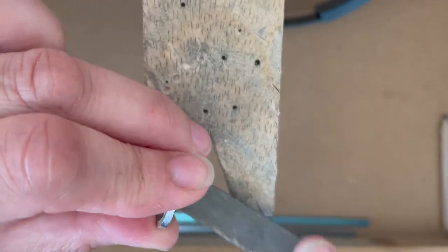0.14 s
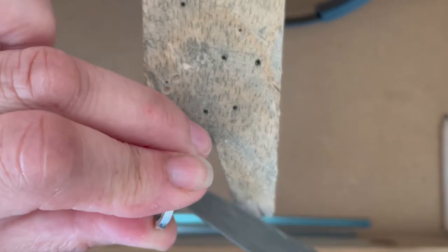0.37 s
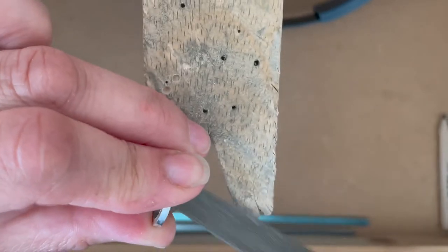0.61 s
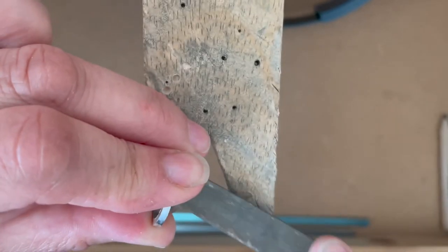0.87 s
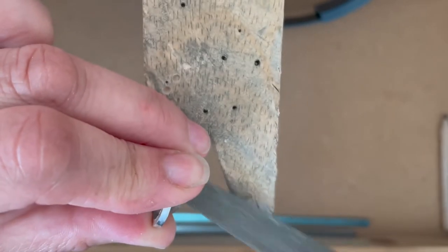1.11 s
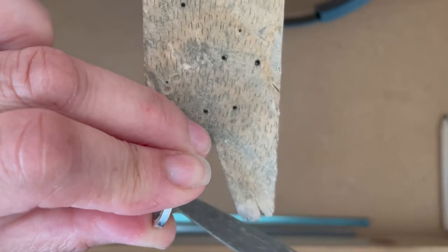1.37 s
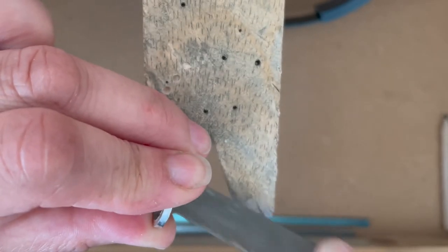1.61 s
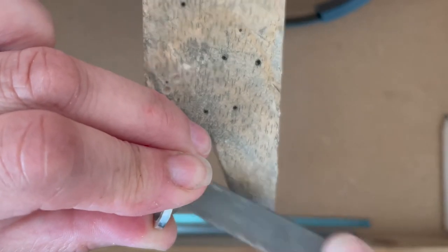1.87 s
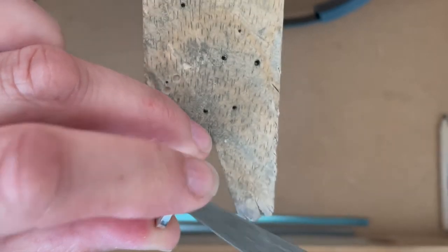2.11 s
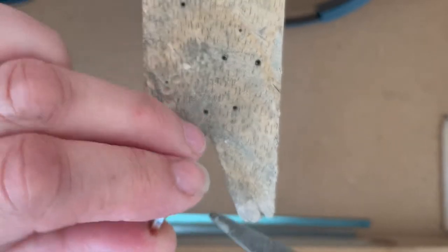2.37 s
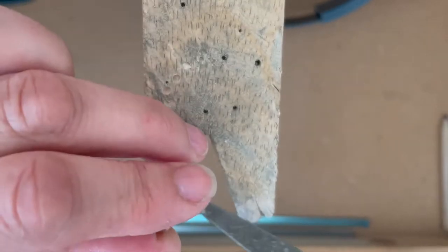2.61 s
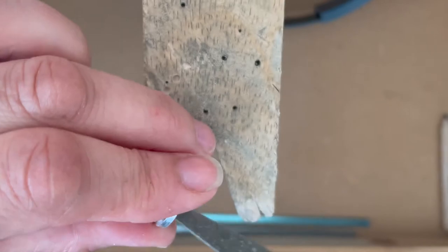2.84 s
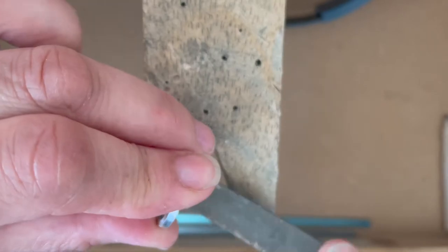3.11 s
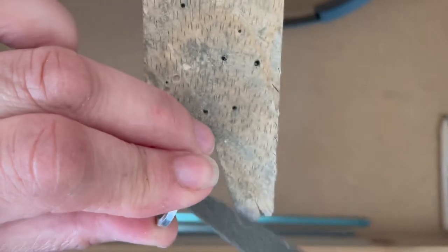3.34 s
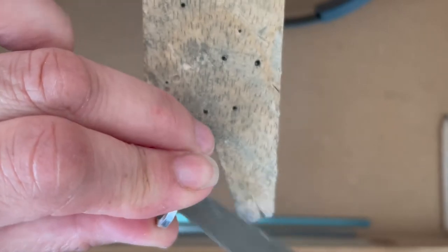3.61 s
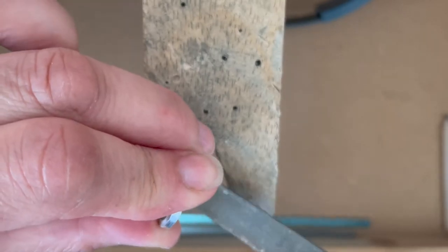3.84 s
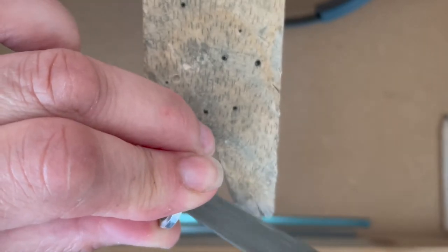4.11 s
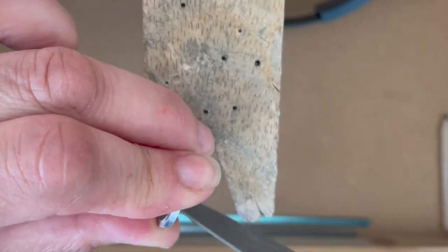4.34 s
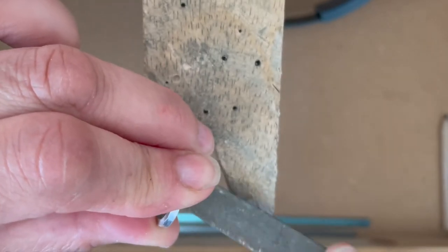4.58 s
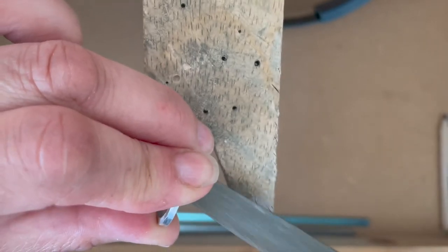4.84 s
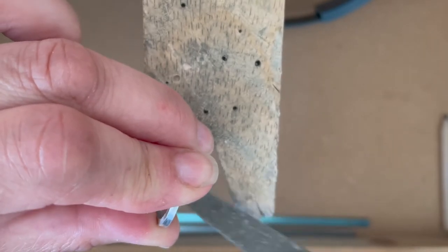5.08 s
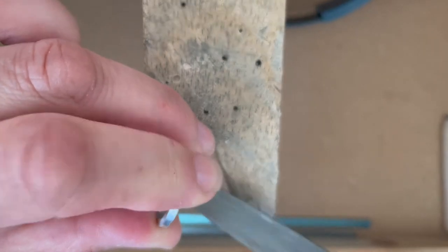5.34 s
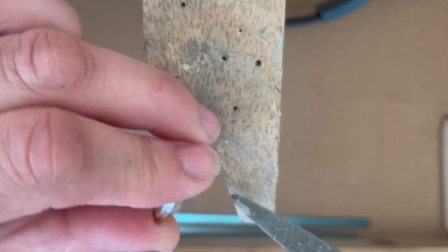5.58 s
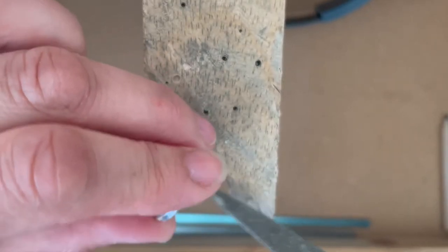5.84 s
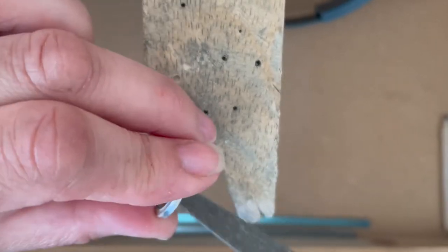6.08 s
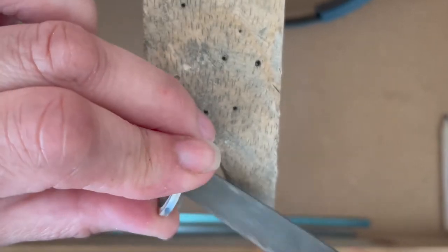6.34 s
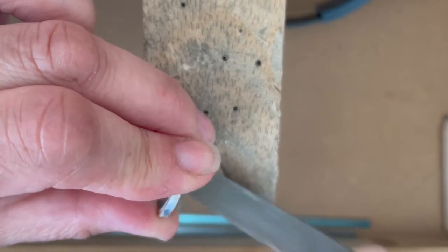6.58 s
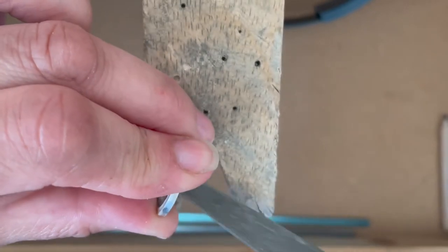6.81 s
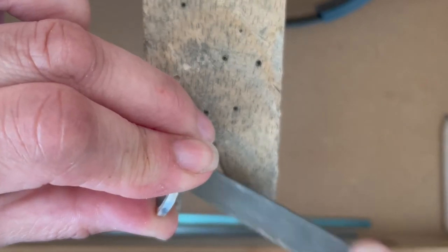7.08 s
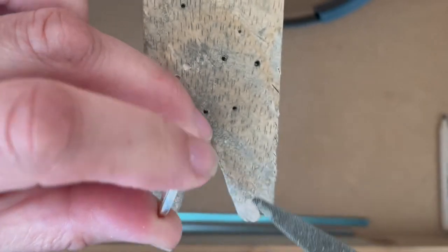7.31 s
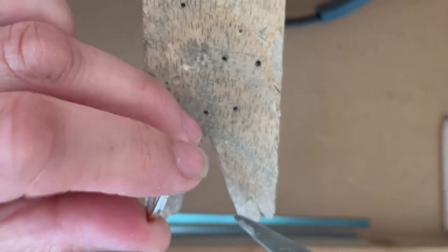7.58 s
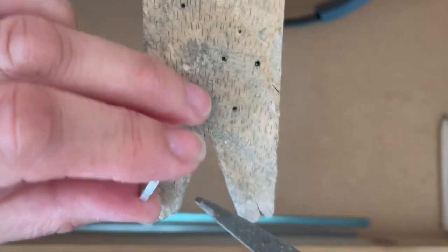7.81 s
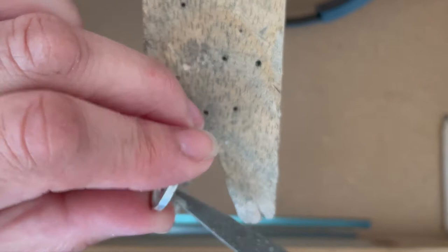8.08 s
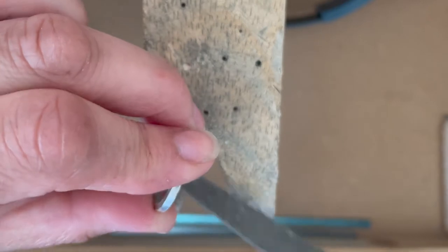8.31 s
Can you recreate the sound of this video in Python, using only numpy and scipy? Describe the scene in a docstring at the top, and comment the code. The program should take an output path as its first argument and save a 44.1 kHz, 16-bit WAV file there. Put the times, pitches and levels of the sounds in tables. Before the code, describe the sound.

Close stereo pickup in a quiet indoor room. A steel file scrapes to and fro over a small metal piece held on a wooden peg, about six strokes a second, dry and gritty with a woody body. Three bursts each end in a brief skid; light taps and faint finger rubs fill the pauses, and one last short stroke closes it.

```python
"""A hand file rasps to and fro over a small metal piece on a wooden bench peg: three bursts, then a brief last one.
Dense random tooth clicks, swelling with each stroke, ring modes of the bench, the peg and the file.
Skids close the bursts; light taps (clicks into soft resonances) and finger rubs (gentle strokes) lie around them.
A quiet room hums below, of shaped noise and wavering tones, with faint regular ticking.
Two close microphone ports hear it all with a phase difference that turns with frequency."""
import sys
import numpy as np
from scipy import signal
from scipy.fft import rfft, irfft, next_fast_len
from scipy.io import wavfile
from scipy.ndimage import map_coordinates

SR = 44100
rng = np.random.default_rng(int(sys.argv[2]) if len(sys.argv) > 2 else 0)


def put_to_file(sound):
    """Save the sound as 16-bit audio at rate SR, in the file named by the first command-line argument."""
    columns = np.atleast_2d(sound).T  # one column per channel
    safe = np.clip(columns, -1, 1)
    whole_steps = np.round(safe * 32767)
    wavfile.write(sys.argv[1], SR, whole_steps.astype(np.int16))


def convert_level_to_amplitude(level_db):
    """Map a level in decibels to its linear amplitude factor."""
    exponent = np.asarray(level_db, float) / 20
    return 10 ** exponent


N = 372204

# upper modes of the wooden peg: (frequency [Hz], width [Hz], relative level [dB])
PEG_UPPER_MODES = [(2021, 98, -4.5), (2291, 96, -4.5), (2653, 286, 1.5), (2952, 298, -2.5), (3173, 91, -3),
                   (3622, 132, -7), (3766, 300, -15.5)]
# ringing modes of the steel file: (frequency [Hz], width [Hz], relative level [dB])
FILE_MODES = [(4500, 900, -8), (5000, 240, -10), (5210, 35, 0), (5413, 300, 3), (5940, 300, -11.5),
              (6610, 270, -4.5), (6950, 56, -2), (7470, 1100, -0.5), (8900, 130, -8.5)]
# sizzling top modes of the file: (frequency [Hz], width [Hz], relative level [dB])
FILE_TOP_MODES = [(9100, 500, 2), (9900, 500, 3), (10700, 600, 2), (11600, 400, -2), (12400, 900, -3),
                  (13400, 500, -8), (15200, 700, -19)]


def rms_one(x):
    """Scale to rms 1."""
    return x / np.sqrt(np.mean(x ** 2) + 1e-20)


def in_time(rows):
    """Breakpoints (time [s], value) drawn out to a curve over all samples."""
    s, value = np.transpose(rows)
    return np.interp(np.arange(N) / SR, s, value)


def drift(rate_hz):
    """Slow random curve of rms 1: noise through a double pole, made at every 40th sample."""
    hop = 40
    r = np.exp(-2 * np.pi * rate_hz * hop / SR)
    noise = rng.standard_normal(N // hop + 2002)
    slow = rms_one(signal.lfilter([1], [1, -2 * r, r * r], noise)[2000:])  # drop the run-in
    return np.interp(np.arange(N) / hop, np.arange(len(slow)), slow)


def resonance(x, hz, width_hz):
    """Two-pole resonance with gain 1 at its peak."""
    r = np.exp(-np.pi * width_hz / SR)
    zeros = (1 - r * r) / 2 * np.array([1, 0, -1])
    poles = [1, -2 * r * np.cos(2 * np.pi * hz / SR), r * r]
    return signal.lfilter(zeros, poles, x + 1e-18)


def body(force, modes, shifting_db):
    """Parallel modes, each drifting in level as a wandering contact would; white force of rms 1 gives about rms 1."""
    power = sum(convert_level_to_amplitude(2 * db) * np.pi * width / SR for _, width, db in modes)
    out = np.zeros(N)
    for k, (hz, width, db) in enumerate(modes):
        drive = force * convert_level_to_amplitude(shifting_db * drift(9.4))
        out += (-1) ** k * convert_level_to_amplitude(db) * resonance(drive, hz, width)
    return out / np.sqrt(power)


def teeth(per_s, spread_db, chatter_db):
    """Teeth catch at random with chattering strength, a few far harder than the rest; rms 1."""
    sizes = convert_level_to_amplitude(spread_db * np.minimum(rng.exponential(1, N), 5)) * rng.choice([-1, 1], N)
    caught = rng.random(N) < per_s / SR
    return rms_one(sizes * caught * convert_level_to_amplitude(chatter_db * drift(120)))


def blows(rows, db, delay_s):
    """One click per row, at the time in its first column."""
    clicks = np.zeros(N)
    clicks[((np.array(rows)[:, 0] + delay_s) * SR).astype(int)] = convert_level_to_amplitude(db)
    return clicks


def swell(start, fastest, end):
    """Samples of one movement, how far along it is (0-1, fastest at .5) and its speed (0-1)."""
    at = np.arange(max(int(start * SR), 0), min(int(end * SR), N))
    along = np.interp(at / SR, [start, fastest, end], [0, .5, 1])
    return at, along, np.sin(np.pi * along)


def tail(t60_s):
    """Reverberant tail: exponentially dying noise of energy 1."""
    t = np.arange(SR) / SR
    h = rng.standard_normal(len(t)) * convert_level_to_amplitude(-60 * t / t60_s)
    return h / np.sqrt(np.sum(h ** 2))


def rumble():
    """Dull room noise: white noise coloured in the spectrum."""
    # room noise spectrum: (frequency [Hz], relative level per Hz [dB])
    colour_points = [(59, -44), (100, 6.5), (177, -6.5), (393, -10), (665, -22.5), (1550, -32.5),
                     (1790, -27), (2790, -37.5), (3380, -50), (4500, -36.5), (5850, -63), (9900, -120)]
    hz = np.fft.rfftfreq(N, 1 / SR) + 1
    point_hz, point_db = np.transpose(colour_points)
    colour = convert_level_to_amplitude(np.interp(np.log(hz), np.log(point_hz), point_db))
    return convert_level_to_amplitude(-75) * rms_one(irfft(rfft(rng.standard_normal(N)) * colour, N))


def wavering_hum():
    """Low sines that wander in pitch and level under a common level curve."""
    # wavering tones: (mean frequency [Hz], relative level [dB])
    hum_tones = [(61.5, 0), (82.5, -4)]
    # rms level of the whole hum: (time [s], level [dB])
    hum_curve = [(0.0, -57), (0.61, -70), (0.65, -71), (0.84, -60), (0.96, -62), (2.44, -63), (2.54, -70),
                 (3.74, -59.5), (4.7, -64), (4.89, -59.5), (5.08, -66), (6.23, -63.5), (6.37, -71),
                 (6.89, -60), (7.69, -74), (8.44, -74)]
    hum = np.zeros(N)
    for tone_hz, db in hum_tones:
        phase = 2 * np.pi * np.cumsum(tone_hz + 4 * drift(6)) / SR
        hum += convert_level_to_amplitude(db + 2.5 * drift(4)) * np.sin(phase)
    return convert_level_to_amplitude(in_time(hum_curve)) * rms_one(hum)


def hiss():
    """Faint treble noise: a broad noise band feeds parallel resonances that drift in level."""
    # bands of the hiss: (frequency [Hz], width [Hz], relative level [dB])
    hiss_bands = [(5100, 300, -3), (6800, 1500, -4), (8000, 1200, -4), (10000, 1200, -3), (11400, 500, 2),
                  (12500, 1000, -4), (13400, 150, 3)]
    steep = resonance(rng.standard_normal(N), 11000, 9000)
    return convert_level_to_amplitude(-87) * rms_one(body(steep, hiss_bands, shifting_db=3.2))


def ticking():
    """Two faint regular tickings: each click, slightly uneven in level, rings a resonance twice over."""
    # tickings: (first tick [s], period [s], frequency [Hz], width [Hz], mean click level before ringing [dB])
    tick_rows = [(.0318, .06665, 6500, 2500, -56), (.135, .1666, 7600, 1500, -53)]
    out = np.zeros(N)
    for first, period, tick_hz, width, db in tick_rows:
        clicks = np.zeros(N)
        at = (np.arange(first, N / SR, period) * SR).astype(int)
        clicks[at] = convert_level_to_amplitude(db + rng.normal(0, 2.5, len(at)))
        out += resonance(resonance(clicks, tick_hz, width), tick_hz, width)
    return out


def room_tone():
    """The quiet room: rumble, wavering hum, hiss, a thin tone of very narrow noise, and ticking."""
    thin_tone = convert_level_to_amplitude(-82) * rms_one(resonance(rng.standard_normal(N), 325, 7.3))
    return rumble() + wavering_hum() + hiss() + thin_tone + ticking()


def taps():
    """A short crack from peg and file, the heavy bench late; soft contact keeps treble out of the low modes."""
    # taps of file and piece:
    # (time [s], peg level [dB], then levels re peg of bench [dB], upper peg [dB], file [dB])
    tap_rows = [(2.24, -31, -13, -6, -25.5), (2.545, -70.5, 0, -15, -16), (2.57, -69, -6, -11, -20),
                (2.862, -43, -13.5, -0.5, -13.5), (5.529, -30, -14.5, -5.5, -25),
                (5.575, -55, -3, -16, -19), (5.709, -63, 1.5, -27, -18), (6.042, -40, -13.5, -4, -14),
                (7.438, -56, 0.5, -28, -27), (7.723, -50.5, -3.5, -37, -42), (7.881, -70.5, 1.5, -15, -17),
                (8.232, -57.5, -11, -6, -21)]
    # what a tap rings, part by part: (frequency [Hz], width [Hz], relative peak level [dB])
    bench_rings = [(124, 28, 4), (235, 60, -4), (400, 45, -7), (565, 28, -3), (764, 30, -6)]
    peg_rings = [(1400, 230, 1), (1100, 160, -11)]
    upper_rings = [(2137, 50, -11), (2650, 330, 4), (3550, 300, -2)]
    file_rings = [(4300, 300, 3), (5300, 200, 6), (6600, 250, 0), (7250, 300, 3), (9800, 1200, 1)]
    top_rings = [(12200, 1500, 14), (14600, 1500, -17)]  # only hard steel contact reaches these
    _, peg_db, bench_re, upper_re, file_re = np.transpose(tap_rows)
    parts = [(bench_rings, peg_db + bench_re, .005, 1000),  # modes, level [dB], delay [s], softness cutoff [Hz]
             (peg_rings, peg_db, .0005, 2200),
             (upper_rings, peg_db + upper_re, .0002, 4200),
             (file_rings, peg_db + file_re, .0002, 15000),
             (top_rings, peg_db + 2 * file_re + 18, .0002, 17000)]
    out = np.zeros(N)
    for modes, db, delay_s, soft_hz in parts:
        softness = signal.butter(4, soft_hz, fs=SR, output="sos")
        push = signal.sosfilt(softness, blows(tap_rows, db, delay_s) + 1e-18)
        for k, (hz, width, gain_db) in enumerate(modes):
            unit_peak = SR / (2 * np.pi * width)  # a bare click would ring with peak 1
            out += (-1) ** k * convert_level_to_amplitude(gain_db) * unit_peak * resonance(push, hz, width)
    return out


def skids():
    """With little contact left the file tip rings more freely; the pitch of tip and peg sags as it slides off."""
    # the tip skids off the piece: (start [s], length [s], force level at the fastest point [dB])
    skid_rows = [(2.069, 0.04, -51.5), (5.363, 0.076, -49), (7.149, 0.033, -52.5)]
    # modes of the freed tip: (frequency [Hz], width [Hz], relative level [dB])
    tip_modes = [(1650, 120, -8), (3250, 90, 0), (3650, 90, 2), (4300, 250, -10), (5050, 120, -1),
                 (5350, 120, -5)]
    sag = 0.17  # fall in playing speed over a skid, as a share
    level, at_s = np.zeros(N), np.arange(N) / SR
    for start, length, db in skid_rows:
        at, along, speed = swell(start, start + length / 2, start + length)
        level[at] = convert_level_to_amplitude(db) * speed ** 1.36
        at_s[at] += sag * length * along * (1 - along) / 2  # read fast at first, slowly at last
    force = level * teeth(per_s=3000, spread_db=2.5, chatter_db=1.5)
    tip = body(force, tip_modes, shifting_db=1.5)
    peg = convert_level_to_amplitude(-3.5) * body(force, PEG_UPPER_MODES, shifting_db=1.5)
    ring = convert_level_to_amplitude(-7.5) * body(force, FILE_MODES, shifting_db=1.5)
    sizzle = convert_level_to_amplitude(2) * body(force, FILE_TOP_MODES, shifting_db=1.5)
    return map_coordinates(tip + peg, [at_s * SR], order=3) + ring + sizzle


def movements():
    """Force on each part over all strokes and rubs; strokes keep contact at reversals, rubs start and end at rest."""
    # strokes, each running until the next stroke or lift:
    # (start [s], fastest [s], bite [dB], brightness [dB], bench re bite [dB])
    stroke_rows = [(-0.06, 0.03, -44.5, -2, 1.5), (0.131, 0.25, -42, 2.5, -3), (0.317, 0.403, -45.5, -1, 1),
                   (0.512, 0.636, -47, 4.5, 1.5), (0.675, 0.786, -48.5, -1, 5), (0.855, 0.99, -48, 2, -2),
                   (1.027, 1.131, -51, 0.5, 4.5), (1.207, 1.349, -48, 0.5, 0), (1.399, 1.5, -48, 0, 1.0),
                   (1.564, 1.687, -45.5, 1, -2.5), (1.728, 1.819, -49.5, -1.5, 0.5),
                   (1.908, 2.049, -50, 0, 1.5), (2.857, 2.905, -56.5, 3, -12),
                   (2.89, 3.003, -49.5, -1.5, 4), (3.116, 3.253, -44, 1.5, -2.5), (3.29, 3.403, -52, 1, 5),
                   (3.5, 3.609, -49, 1.5, -1.5), (3.672, 3.766, -44, 0, 0.5),
                   (3.844, 3.923, -47.0, -0.5, 1), (4.035, 4.139, -46.5, -0.5, -3),
                   (4.205, 4.304, -43.5, 1, -3.5), (4.373, 4.484, -52.0, 1, 3.5),
                   (4.574, 4.699, -47, 0, -5.5), (4.74, 4.844, -54.5, 2.5, 9),
                   (4.919, 5.026, -52, 0.5, -0.5), (5.095, 5.193, -49, 1, 3), (5.242, 5.372, -54, -1, 3),
                   (6.033, 6.118, -61, 2, 8), (6.115, 6.202, -43, 0.5, -2), (6.278, 6.414, -54, 3, 4),
                   (6.481, 6.592, -44.5, -1, 0.5), (6.659, 6.764, -49, 2, 2.5), (6.86, 6.949, -44, 1, 1),
                   (7.014, 7.159, -49.5, 2, -1.5), (8.215, 8.271, -59, 1, -5.5),
                   (8.292, 8.393, -41.5, 2, -3.5)]
    # the file leaves the piece: (time [s])
    lift_times = [2.092, 5.383, 7.187, 8.48]
    # fingers shift the piece on the peg:
    # (start [s], length [s], bite [dB], brightness [dB], bench re bite [dB])
    rub_rows = [(2.463, 0.042, -84.5, -14, 6), (2.54, 0.064, -85, -8.5, -7), (2.649, 0.0765, -80, 2.5, 3),
                (2.707, 0.052, -97, -7, 17.5), (5.4, 0.15, -71.5, 3, 3), (5.56, 0.095, -69.5, 1.5, 2.5),
                (5.675, 0.041, -74, -14, 12.5), (5.79, 0.071, -81.5, 4.5, 11.5),
                (7.462, 0.067, -80, -16.5, 10.5), (7.711, 0.13, -78.5, 1, 10), (7.921, 0.074, -84, 4, 5.5)]
    # how lower peg, upper peg, file ring, file sizzle and bench thrum answer a stroke: (level re bite [dB],
    # share of brightness [dB/dB], power of speed, speed added by held contact, gain by mid-stroke [dB])
    part_answers = [(0.5, 0, 1.85, 0.071, -1.5), (-0.34, 1.9, 3.7, 0.17, -4), (-15.5, 2.7, 2.6, 0.2, 3.5),
                    (-15, .9, 1.5, 0.41, 0), (-0.5, 0.26, 0.66, 0.1, 0.5)]
    stops = np.sort([row[0] for row in stroke_rows] + lift_times)
    strokes = [(s, fastest, stops[stops > s][0], *db, 1) for s, fastest, *db in stroke_rows]
    rubs = [(s, s + length / 2, s + length, *db, 0) for s, length, *db in rub_rows]
    out = np.zeros((len(part_answers), N))
    for start, fastest, end, bite_db, bright_db, bench_db, held in strokes + rubs:
        at, along, speed = swell(start, fastest, end)
        for part, (db, share, power, rest, gain_db) in enumerate(part_answers):
            level_db = bite_db + db + share * bright_db + gain_db * 2 * along
            out[part, at] += convert_level_to_amplitude(level_db) * (speed + held * rest) ** power
        out[-1, at] *= convert_level_to_amplitude(bench_db)
    return out


def table_top(thrum):
    """Deep table-top mode shaken by noise whose level follows most of the bench thrum."""
    hz = 128
    shake = convert_level_to_amplitude(-13) * thrum ** 0.92 * rng.standard_normal(N)
    return body(resonance(shake, hz, 45), [(hz, 24, 0)], shifting_db=.4)


def filing():
    """The same teeth drive bench, peg and file; finer teeth join in on the steel."""
    # sudden hard bites inside a stroke: (time [s], strength before each part's gain [dB])
    catch_rows = [(0.159, -50), (0.555, -33), (0.6, -28.5), (0.648, -34.5), (0.892, -47), (1.443, -44.5),
                  (1.614, -46), (1.829, -37), (3.715, -56), (3.89, -32), (4.101, -29), (5.288, -41),
                  (6.17, -36), (6.323, -45), (6.342, -37.5), (6.396, -35.5), (6.909, -34), (7.062, -48),
                  (8.28, -40.5)]
    # how brightly the part of the file in use cuts: (time [s], gain on the steel's force [dB])
    keenness = [(0, -1.5), (1.2, 1.5), (2.1, -2), (2.9, -0.5), (3.9, -6.5), (4.4, -3.5), (5.0, -3),
                (5.4, 0.5), (6.1, -4), (6.6, -3), (7.2, -2), (8.44, -2.5)]
    # bench modes: (frequency [Hz], width [Hz], relative level [dB])
    bench_modes = [(194.5, 110, -17.5), (282.7, 68.7, -1), (329.2, 19.2, 2.5), (395, 20, -5.5),
                   (511.6, 45, -16.5), (545.6, 23, -10), (668, 59, -18.5)]
    # lower modes of the wooden peg: (frequency [Hz], width [Hz], relative level [dB])
    peg_lower_modes = [(731.4, 40, -3.5), (898, 50, -5.5), (987.5, 26.3, 5.5), (1169, 65, 0),
                       (1254.5, 65, 4), (1396, 190, -5)]
    lower, upper, ring, sizzle, thrum = movements()

    # a catch loads the teeth at once and lets go gradually, 16 ms time constant
    catch_db = np.array(catch_rows)[:, 1]
    fading = np.exp(-1 / (0.016 * SR))
    caught = signal.lfilter([1], [1, -fading], blows(catch_rows, catch_db - 10.5, 0) + 1e-18)
    snap = convert_level_to_amplitude(4) * blows(catch_rows, catch_db, 0)  # the first tooth of a catch

    force = teeth(per_s=3300, spread_db=3, chatter_db=1.5)
    fine = 0.21 * force + 0.31 * teeth(per_s=5700, spread_db=3, chatter_db=1)
    fine = fine * convert_level_to_amplitude(in_time(keenness))

    bench = body(thrum * force, bench_modes, shifting_db=4)
    bench = signal.sosfilt(signal.butter(3, 200, "high", fs=SR, output="sos"), bench)
    peg_low = -body((lower + convert_level_to_amplitude(-2.5) * caught) * force + snap, peg_lower_modes, shifting_db=3.5)
    peg_high = body((upper + convert_level_to_amplitude(-4) * caught) * force + snap, PEG_UPPER_MODES, shifting_db=1.5)
    steel = -body((ring + convert_level_to_amplitude(-13) * caught) * fine + convert_level_to_amplitude(-15.5) * snap, FILE_MODES, shifting_db=4.5)
    top = body((sizzle + convert_level_to_amplitude(-20) * caught) * fine + convert_level_to_amplitude(-13) * snap, FILE_TOP_MODES, shifting_db=2)
    return table_top(thrum) + bench + peg_low + peg_high + steel + top


def scene():
    """Filing, skids and taps with the room's near and late reply, over the room tone."""
    work = filing() + skids() + taps()
    near = convert_level_to_amplitude(-12) * tail(0.17)
    late = convert_level_to_amplitude(-18.5) * signal.sosfilt(signal.butter(1, 11000, fs=SR, output="sos"), tail(0.48))
    heard = work + signal.fftconvolve(work, near + late)[:N] + room_tone()
    return np.array([heard, heard])


def band_limit(x):
    """A steep low-pass at the top of the band."""
    return signal.sosfilt(signal.butter(12, 15980, fs=SR, output="sos"), x)


def record(dry):
    """The deep bass is cut; each port gets its own phase and level, plus scattered sound of opposite sign."""
    # microphone ports: (frequency [Hz], phase lead of left [rad], left over right [dB],
    # scattered sound of opposite sign in the two ports [dB])
    port_rows = [(0, 0, 0, -34), (60, -.03, -.2, -31), (130, -.07, -.6, -25), (300, -.25, -.8, -18),
                 (600, -.4, 0, -6), (850, 0, 0, -1), (1150, 0, -1.5, -12), (1900, 0, 0, -24),
                 (2900, .7, -2.5, -14), (3650, .6, -5, -7), (4100, .1, -1, -8), (4800, .5, 0, -1),
                 (5500, .4, -2, -7), (6000, .1, 0, -13), (7500, 1.6, 0, -9), (8700, 2.6, 0, -9),
                 (9400, 3.05, 0, -18), (10500, 3.2, 0, -18), (11600, 3.8, 0, -9), (13300, 5.1, 0, -7),
                 (14100, 6.28, 0, -20)]
    dry = signal.sosfilt(signal.butter(3, 44, "high", fs=SR, output="sos"), dry)
    size = next_fast_len(N + SR)
    bins_hz = np.fft.rfftfreq(size, 1 / SR)
    hz, *columns = np.transpose(port_rows)
    lead, balance_db, unlike_db = (np.interp(bins_hz, hz, c) for c in columns)
    side = np.array([[1], [-1]])  # left, right
    scattered = convert_level_to_amplitude(unlike_db) * rfft(tail(.12), size)
    ports = convert_level_to_amplitude(side * balance_db / 2) * np.exp(.5j * side * lead)
    ports = ports * (1 + side * scattered) / np.sqrt(1 + convert_level_to_amplitude(2 * unlike_db))
    mix = irfft(rfft(dry, size) * ports, size)[:, :N]
    return band_limit(mix)


dry = scene()
out = record(dry)
put_to_file(out)
```